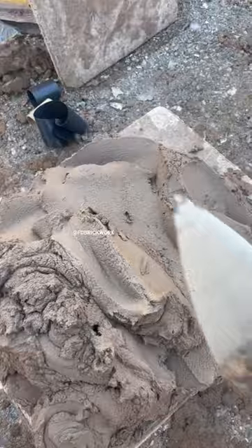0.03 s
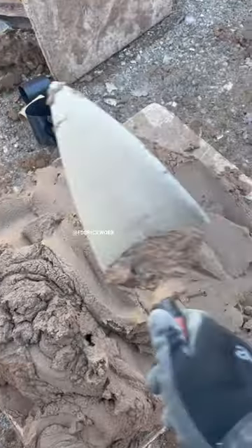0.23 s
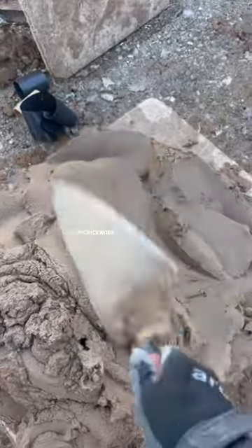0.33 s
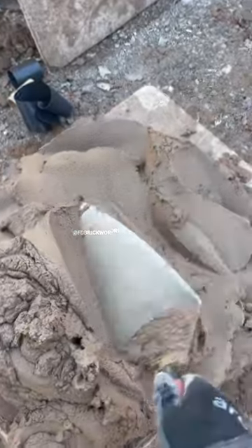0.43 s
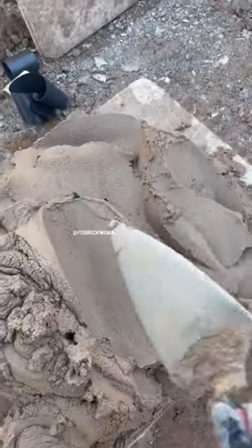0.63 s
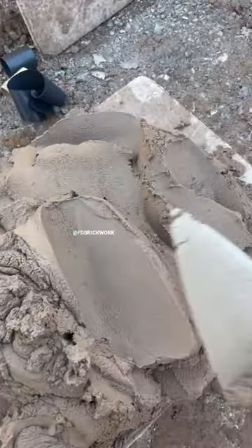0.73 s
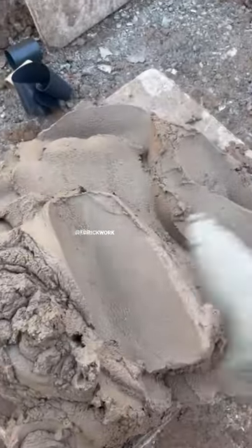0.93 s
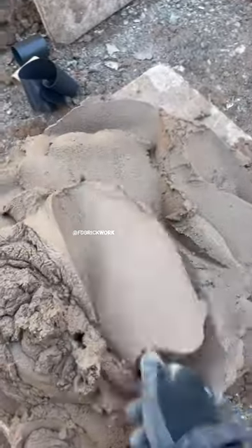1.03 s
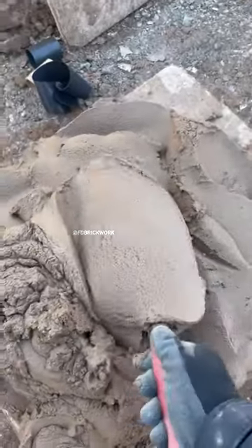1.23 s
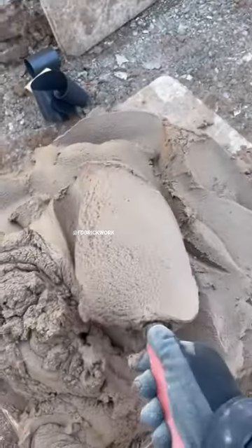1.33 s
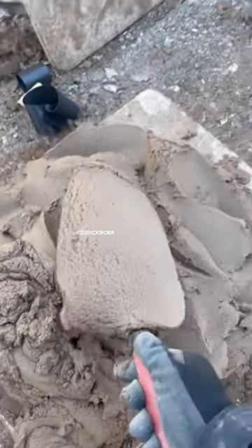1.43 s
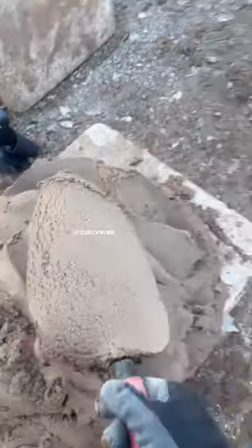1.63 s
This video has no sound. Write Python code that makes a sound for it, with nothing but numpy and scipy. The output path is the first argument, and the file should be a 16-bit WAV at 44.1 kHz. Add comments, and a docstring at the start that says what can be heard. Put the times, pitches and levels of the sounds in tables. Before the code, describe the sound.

A steel trowel scrapes softly through wet mortar, close up. At about 0.3 seconds it slaps down flat, with a damped clink and a thud from the board beneath. A sandy drag follows until 0.8. Near 0.9 the blade stabs in with a gritty slice, small air pops and a soft low thump. Squelchy smearing runs from 1.1 to about 1.7. A low outdoor rumble lies underneath.

```python
"""Trowel in wet mortar

A steel trowel works a heap of wet mortar on a board, close up and outdoors. The blade slaps down flat
and the board thuds; it drags back over the sand in the mix, stabs in with a gritty slice and small
air pops, then smears the heap. A low outdoor rumble lies underneath."""
import sys
import numpy as np
from scipy import signal
from scipy.fft import rfft, irfft
from scipy.io import wavfile
from scipy.ndimage import uniform_filter1d

SR = 44100
rng = np.random.default_rng(int(sys.argv[2]) if len(sys.argv) > 2 else 0)


def unload_wav(signal):
    """Save mono or channel-first audio to the path in sys.argv[1] as 16-bit WAV at rate SR, clipped to [-1, 1]."""
    wavfile.write(
        sys.argv[1],
        SR,
        np.round(np.clip(np.atleast_2d(signal).T, -1, 1) * 32767).astype(np.int16),
    )


N = 74970

# Steel blade damped by mortar: (frequency [Hz], relative level [dB], t60 [s])
BLADE_MODES = [(958, -8, .025), (1335, -23, 0.037), (1637, 1.5, 0.007), (1910, -14, 0.0074),
               (2378, 0, 0.012), (2506, -8, 0.02), (3110, -6, 0.011), (3660, -6.5, 0.013),
               (5115, -15.5, 0.021), (6390, -8.5, 0.013), (6700, -14, .035), (7350, -25, 0.012),
               (12900, -20.5, 0.048)]
# Board under the weight of the heap: (frequency [Hz], relative level [dB], t60 [s])
BOARD_MODES = [(162, -12.5, 0.1), (223.4, 1.5, 0.077), (296, -1, 0.049), (384, -3.5, 0.021),
               (437, 4.5, 0.032), (615, -4.5, .02)]


def undb(db):
    """Decibels to gain."""
    return 10 ** (np.asarray(db) / 20)


def unit(x):
    """Scale to rms 1."""
    return x / np.sqrt(np.mean(x ** 2))


def over_hz(table):
    """Draw a (frequency, value) curve across all FFT bins, on a log frequency axis."""
    hz, values = np.array(table, float).T
    bin_hz = np.arange(N // 2 + 1) * SR / N
    return np.interp(np.log(bin_hz + 1), np.log(hz), values)


def colour(x, eq):
    """Shape a sound with an EQ curve, at rms 1."""
    return unit(irfft(rfft(x) * undb(over_hz(eq)), N))


def since(start):
    """Seconds since a moment, zero before it."""
    return np.maximum(np.arange(N) / SR - start, 0)


def fade(start, t60, attack=1 / SR):
    """Envelope with a linear attack and an exponential decay."""
    return np.minimum(since(start) / attack, 1) * np.exp(-np.log(1000) * since(start + attack) / t60)


def ring(start, modes, attack=1 / SR):
    """Damped modes struck at one moment."""
    return sum(undb(db) * fade(start, t60, attack) * np.sin(2 * np.pi * hz * since(start))
               for hz, db, t60 in modes)


def rub(clicks, modes):
    """Modes kept ringing by a stream of clicks, at rms 1."""
    return unit(signal.fftconvolve(clicks, ring(0, modes)[None], axes=1)[:, :N])


def wander(per_s):
    """Random drift gliding from value to value, at rms 1."""
    step = int(SR / per_s)
    stairs = np.repeat(rng.standard_normal(512), step)[:N]
    return unit(uniform_filter1d(stairs, step))


def grains(per_s, spread_db, limit_db=10):
    """Two independent streams of tiny uneven clicks; the wet paste lets none stand far out."""
    size_db = np.minimum(spread_db * rng.exponential(size=(2, N)), limit_db)
    fires = rng.random((2, N)) < per_s / SR
    return fires * np.sign(rng.standard_normal((2, N))) * undb(size_db)


def stereo(pair):
    """Blend two independent sounds into left and right, with a stereo width that varies by frequency."""
    # Stereo width, from wide at 0 to mono at 1: (frequency [Hz], coherence [0-1])
    likeness = [(100, .985), (350, .95), (800, .6), (1250, .45), (1900, .8), (3000, .45), (4400, .25),
                (5800, .7), (8000, .78), (9300, .995), (10800, .995), (12500, .75), (14500, .97)]
    coherence = over_hz(likeness)
    mid, side = rfft(pair) * np.sqrt(np.array([1 + coherence, 1 - coherence]) / 2)
    return irfft(np.array([mid + side, mid - side]), N)


def stereo_noise(eq):
    """Stereo noise shaped by an EQ curve."""
    return stereo(colour(rng.standard_normal((2, N)), eq))


def outdoor_rumble(level_db=-36.5, waver_db=0.6):
    """The background bed: a wavering low rumble with a faint hiss."""
    # Tone of the open air: (frequency [Hz], gain [dB])
    rumble_eq = [(20, -34), (35, -9), (55, 3), (68, -1), (80, -10.5), (102, -0.5), (140, -13), (220, -17),
                 (400, -21.5), (600, -29.5), (1100, -37.5), (2200, -43), (6000, -48.5), (12000, -56.5),
                 (16000, -55.5)]
    return undb(level_db + waver_db * wander(per_s=8.7)) * stereo_noise(rumble_eq)


def reflections(x, level_db=-18, t60=0.11, top_hz=3630, predelay_s=0.0033):
    """A short, dull reverb off the ground and things nearby."""
    lowpass = signal.butter(1, top_hz, fs=SR, output="sos")
    tail = signal.sosfilt(lowpass, stereo(rng.standard_normal((2, N)))) * fade(predelay_s, t60)
    return undb(level_db) * signal.fftconvolve(x, unit(tail) / np.sqrt(N), axes=1)[:, :N]


def heap_thump():
    """The whole heap shifts with a low thump as it stops the stab."""
    # One bass pulse: (start [s], frequency [Hz], level [dB], swell [s])
    thump = (1.0405, 80, -25.5, .0105)
    start, hz, db, swell = thump
    age = since(start)
    envelope = np.exp(-((age - swell) / swell) ** 2)
    return undb(db) * envelope * np.sin(2 * np.pi * hz * age)


def air_pops(tone_db=-7.5, crack_db=-6.5):
    """Trapped air bursts from the mortar: a small cavity rings, with a sticky crack around its pitch."""
    # Bursting air pockets: (time [s], pitch [Hz], relative level [dB], t60 [s])
    pockets = [(.3160, 2560, -30.5, 0.068), (.8832, 2320, -37, 0.026), (.9298, 1580, -18.5, 0.009),
               (.9358, 1450, -23.5, 0.0085), (0.9527, 3330, -28, 0.023), (.979, 2600, -32, 0.027),
               (1.0392, 1100, -22.5, 0.0099), (1.0548, 2150, -29, 0.0055), (1.111, 1480, -37.5, 0.0063)]
    out = 0
    for start, hz, db, t60 in pockets:
        band = signal.butter(2, [hz * 0.6, hz * 1.23], "band", fs=SR, output="sos")
        attack = 0.5 / hz  # half a cycle
        crack = fade(start, t60, attack) * unit(signal.sosfilt(band, rng.standard_normal(N)))
        tone = ring(start, [(hz, tone_db, t60)], attack)
        out += undb(db) * (tone + undb(crack_db) * crack)
    return out


def board_thuds(cushion_s=0.0003, low_cut_hz=215):
    """The slap pushes through the cushioning heap into the board, which knocks again as it settles."""
    # Blows that reach the board: (time [s], relative level [dB])
    blows = [(.3264, -12), (0.3437, -35), (0.367, -61)]
    knocks = sum(undb(db) * ring(start, BOARD_MODES) for start, db in blows)
    pole = np.exp(-1 / (cushion_s * SR))
    cushioned = signal.lfilter([1 - pole], [1, -pole], knocks)
    low_cut = signal.butter(3, low_cut_hz, "high", fs=SR, output="sos")  # the board radiates little bass
    return signal.sosfilt(low_cut, cushioned)


def scrapes(steel_db=-18, flutter_db=1.3):
    """Sand ticks along the steel and rings it faintly; the wet paste squelches and drags on the board."""
    # Strokes through the mortar:
    # (start [s], attack [s], hold [s], release [s], grit [dB], squelch [dB], board groan [dB])
    strokes = [(0.019, 0.055, 0.057, 0.11, -49.5, -52.5, -56),
               (0.148, 0.098, 0.11, 0.17, -51.5, -51.5, -47), (0.327, .008, .005, 0.061, -53, -46, -65),
               (0.436, .15, .12, 0.089, -45, -52, -59), (0.857, 0.067, 0.011, .02, -48, -49, -67),
               (.931, 0.0024, 0.0073, 0.033, -36, -53, -52),
               (0.937, 0.027, 0.044, 0.065, -38.5, -48.5, -62), (0.993, 0.04, 0.017, 0.03, -88, -46.5, -65),
               (1.058, 0.018, 0.22, .16, -58, -58, -60), (1.366, 0.024, 0.023, 0.056, -67, -52.5, -57.5),
               (1.421, 0.074, 0.038, 0.11, -55, -50.5, -45.5), (1.605, 0.058, .04, .05, -63, -70, -48)]
    # Bright sand on steel: (frequency [Hz], gain [dB])
    grit_eq = [(500, -23), (1500, -2.5), (3000, 0.5), (4500, -2.5), (6500, 2), (9000, -1.5), (13000, 3),
               (14500, -4.5), (16000, -7)]
    # Dark, slipping paste: (frequency [Hz], gain [dB])
    squelch_eq = [(200, -15), (450, 0.5), (850, 2), (1300, -5), (2400, -13), (4000, -13), (9000, -17.5),
                  (16000, -65)]
    sand = grains(per_s=9000, spread_db=5.5)
    slips = grains(per_s=2500, spread_db=2.5)
    grit = stereo(colour(sand, grit_eq) + undb(steel_db) * rub(sand, BLADE_MODES))
    grit *= undb(flutter_db * wander(per_s=70.43))
    squelch = stereo(colour(slips, squelch_eq))
    groan = stereo(rub(slips, BOARD_MODES))
    out = 0
    for start, attack, hold, release, grit_db, squelch_db, groan_db in strokes:
        speed = np.interp(since(0), start + np.cumsum([0, attack, hold, release]), [0, 1, 1, 0])
        out += speed * (undb(grit_db) * grit + undb(squelch_db) * squelch + undb(groan_db) * groan)
    return out


def blade_hits():
    """The blade rings as it lands and is choked by the paste, with a wet splash and a sandy snap."""
    # Blade landings: (time [s], attack [s], ring [dB], splash [dB], snap [dB], splash and snap t60 [s])
    landings = [(0.3221, 0.0021, -13, -19.5, -49, 0.032), (0.3393, 0.00085, -34, -30, -57, .03),
                (0.9363, 0.0017, -39.5, -35, -19.5, .01)]
    # Wet midrange splash: (frequency [Hz], gain [dB])
    splash_eq = [(250, -22), (900, 6), (2500, -7), (3700, 1), (4400, -12), (6500, -5), (10000, -14),
                 (16000, -14)]
    # Crisp, sandy top end: (frequency [Hz], gain [dB])
    snap_eq = [(1500, -13), (4000, -21), (6700, -10), (9000, 2), (12500, 4), (15500, -1)]
    splash, snap = stereo_noise(splash_eq), stereo_noise(snap_eq)
    out = 0
    for start, attack, ring_db, splash_db, snap_db, t60 in landings:
        steel = undb(ring_db) * ring(start, BLADE_MODES, attack)
        spatter = undb(splash_db) * splash + undb(snap_db) * snap
        out += steel + fade(start, t60, attack) * spatter
    return out


def scene():
    """Trowel, board and surroundings reach two microphones that differ in phase and level."""
    # Phase between the microphones: (frequency [Hz], left lead [rad])
    phase = [(100, 0), (350, -.15), (800, -1.3), (1250, 0), (1900, .15), (3000, .8), (4400, .5), (5500, .1),
             (7400, 1.6), (9300, 3.05), (10800, 3.25), (12500, 4.5), (14300, 6.25)]
    # Balance between the microphones: (frequency [Hz], left minus right [dB])
    balance = [(200, 0), (400, -.7), (720, -6), (1300, -3.5), (2400, -1.5), (4400, -2.5), (6500, -.5),
               (12000, 0)]
    work = blade_hits() + board_thuds() + heap_thump() + air_pops() + scrapes()
    mix = work + reflections(work) + outdoor_rumble()
    left = np.exp(1j * over_hz(phase) / 2) * undb(over_hz(balance) / 2)  # each side takes half
    return irfft(rfft(mix) * np.array([left, 1 / left]), N)


def record(dry):
    """A moment of silence, a quick fade-in and a steep cut of the very top."""
    start_s, fade_in_s, top_hz = 0.034, 0.0016, 16000
    fade_in = np.minimum(since(start_s) / fade_in_s, 1)
    high_cut = signal.ellip(8, 0.2, 70, top_hz, fs=SR, output="sos")
    return signal.sosfilt(high_cut, dry * fade_in)


dry = scene()
out = record(dry)
unload_wav(out)
```